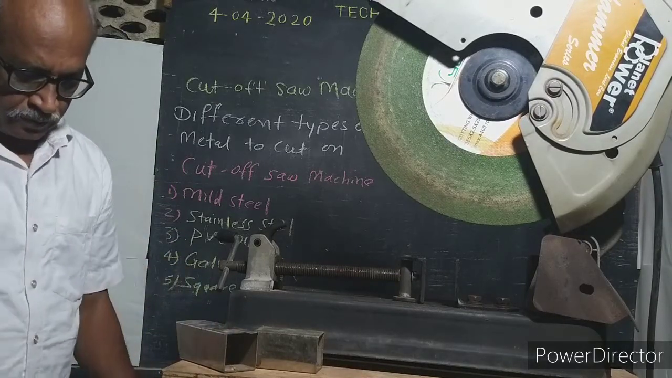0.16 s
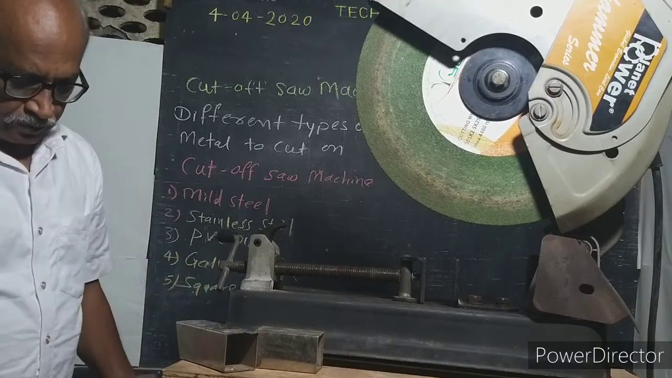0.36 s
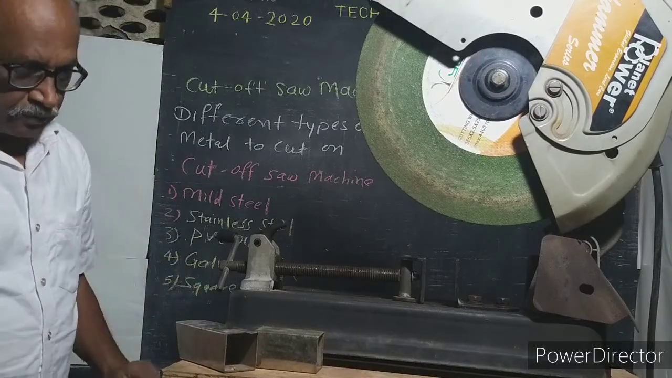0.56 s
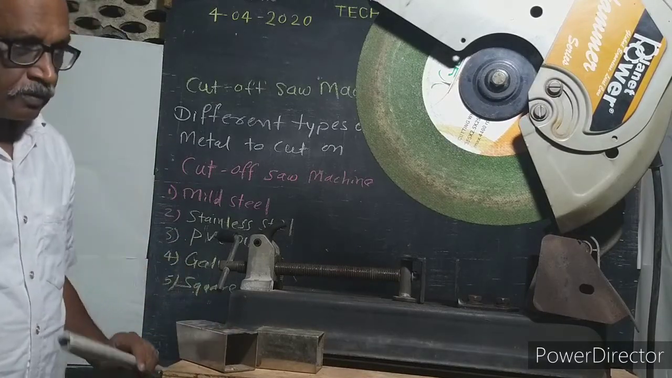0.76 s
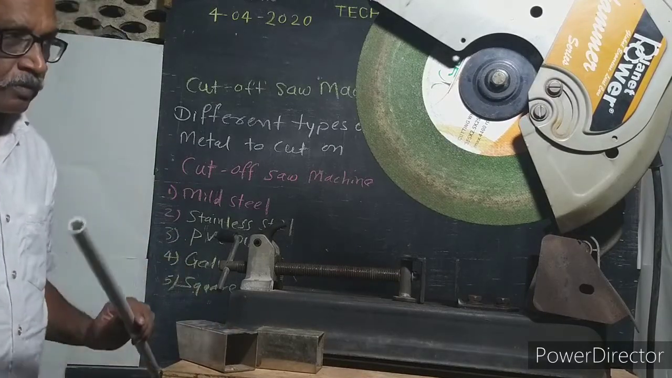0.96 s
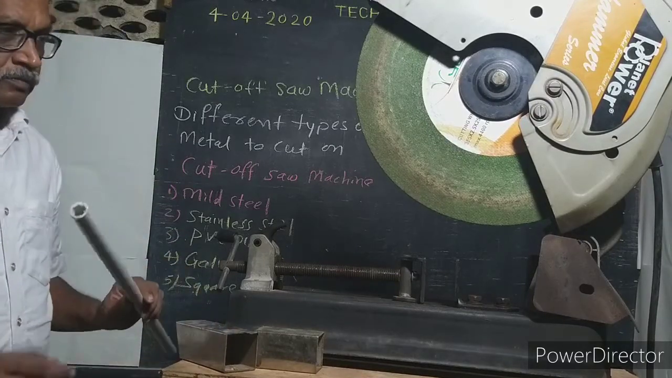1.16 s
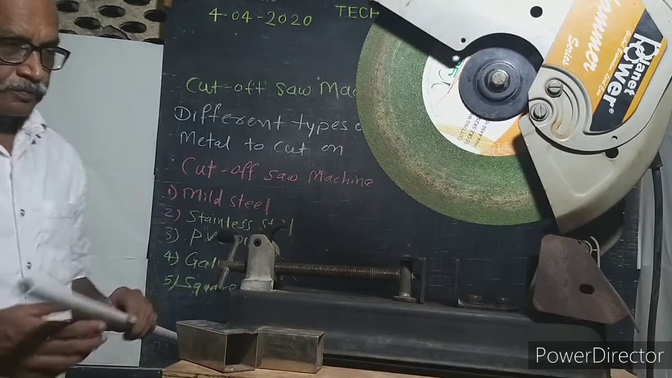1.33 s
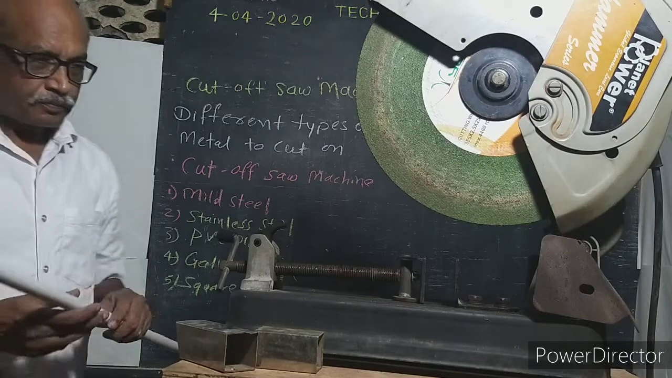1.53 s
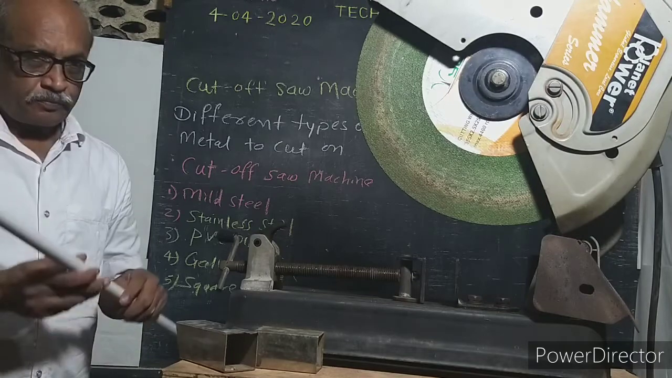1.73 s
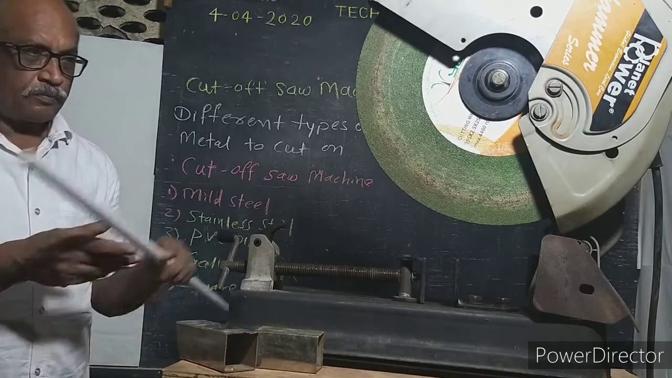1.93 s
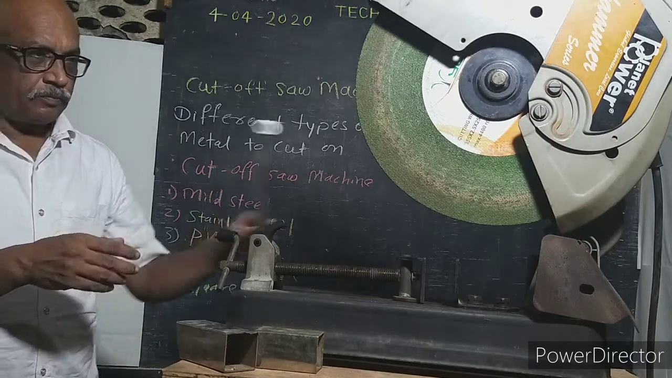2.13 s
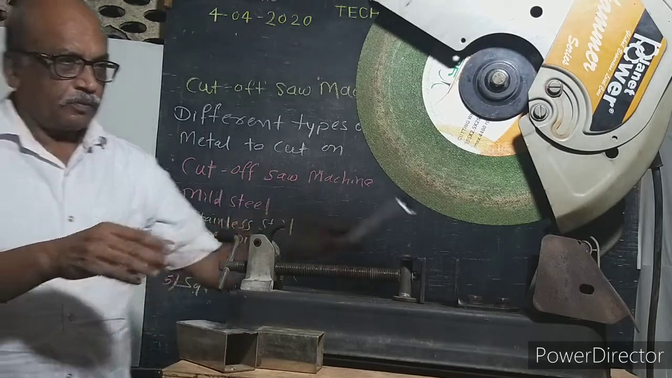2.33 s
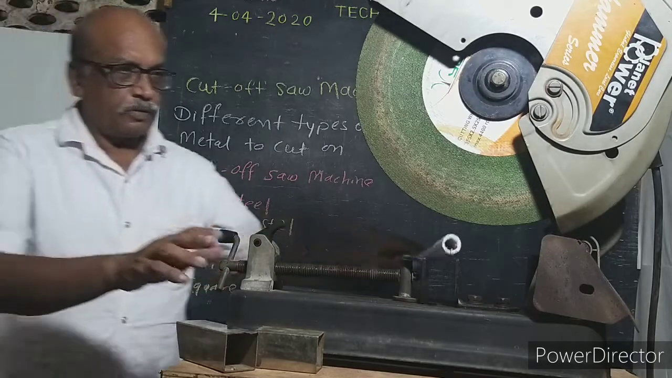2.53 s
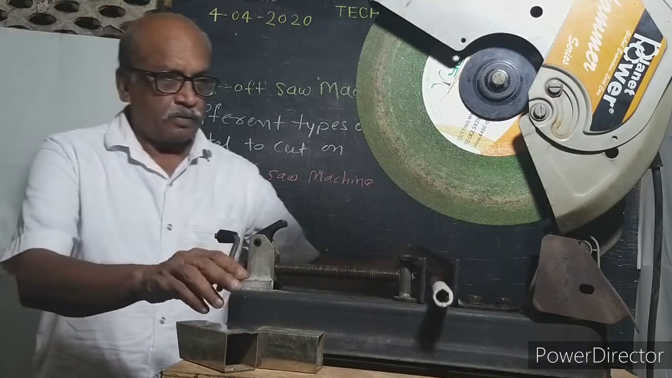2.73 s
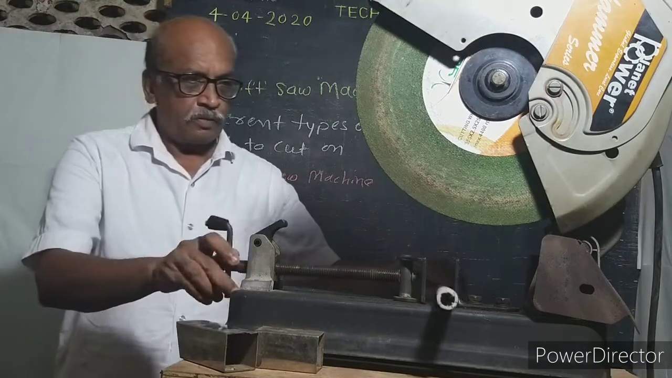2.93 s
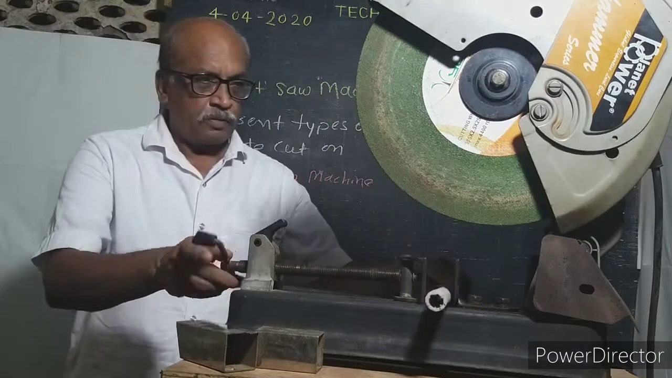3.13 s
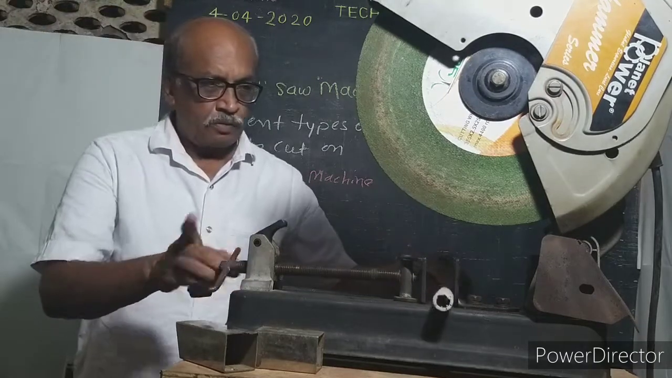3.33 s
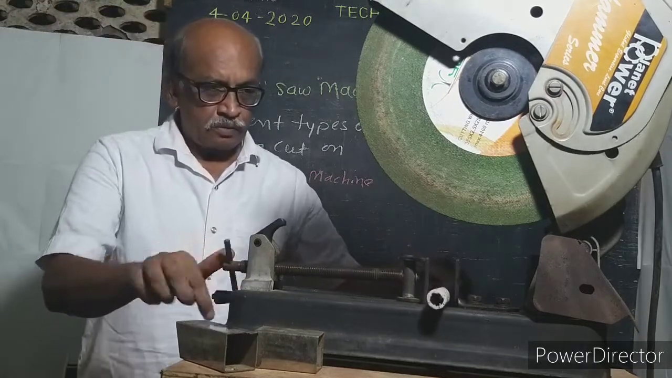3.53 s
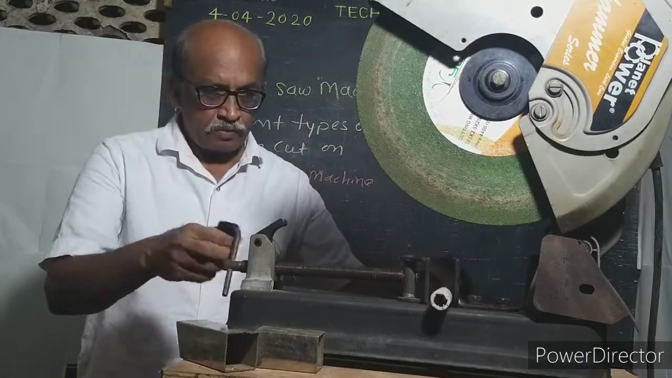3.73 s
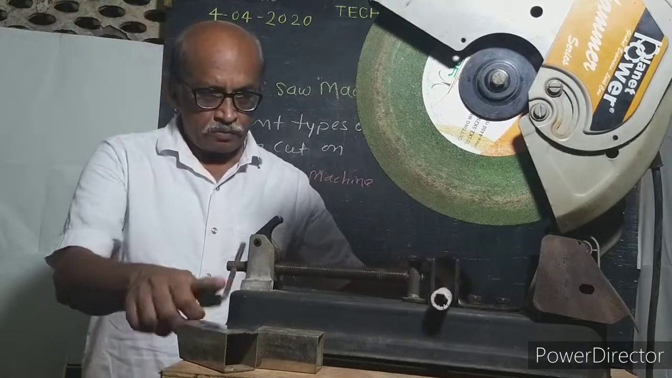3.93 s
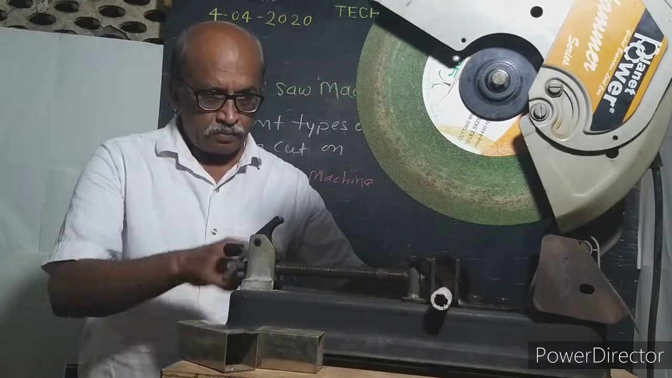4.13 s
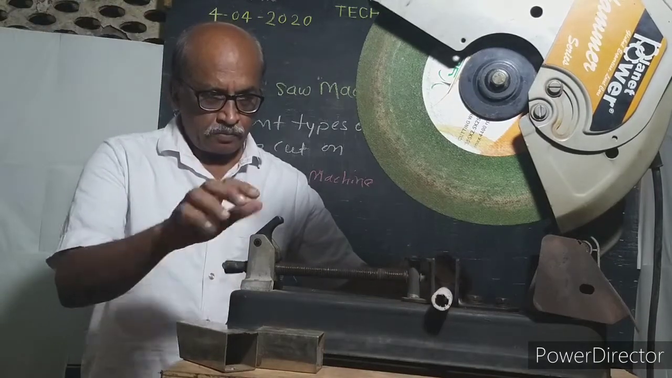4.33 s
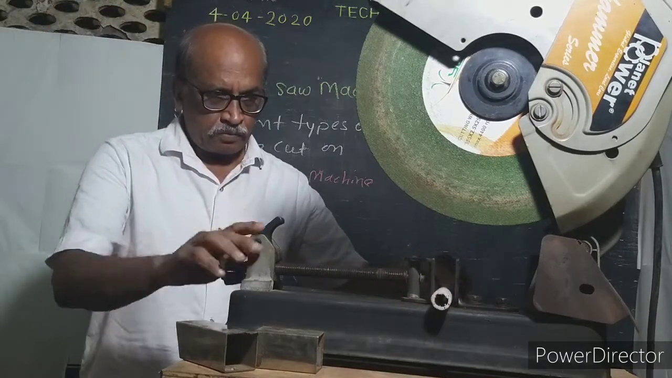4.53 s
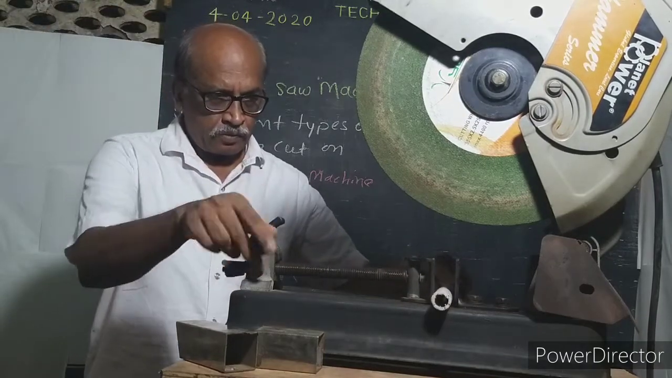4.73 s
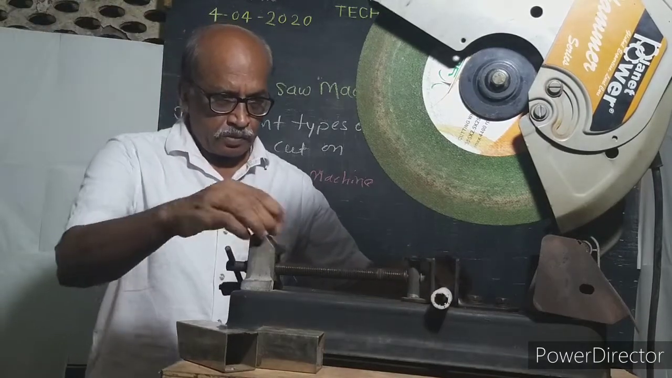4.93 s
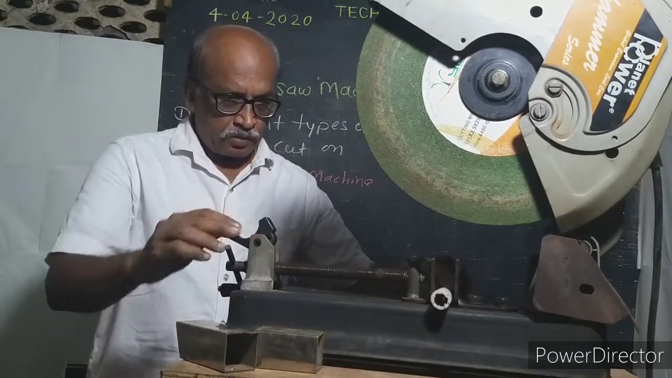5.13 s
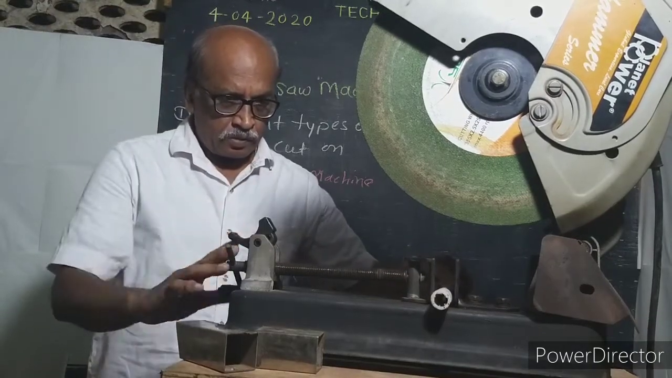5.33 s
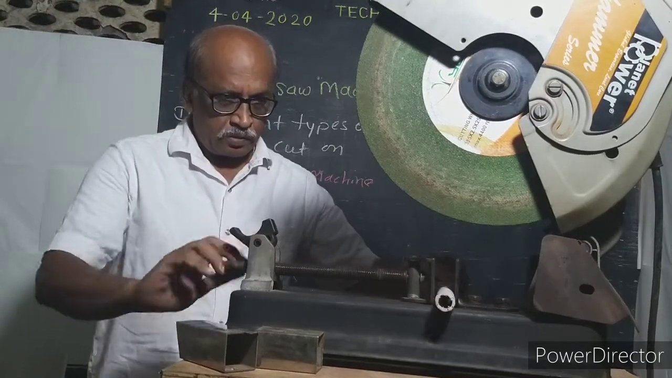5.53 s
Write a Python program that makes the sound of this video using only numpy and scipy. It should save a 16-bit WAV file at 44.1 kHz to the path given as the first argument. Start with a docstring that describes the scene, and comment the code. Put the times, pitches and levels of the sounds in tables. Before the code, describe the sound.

A small, hard workshop heard close in stereo, with low still air and barely audible mains hum. At 0 s a metal pipe clinks, fairly dull with a fine high ring that fades. Until about 2.3 s there is only quiet handling: hand and sleeve brushing metal, a dry snap near 0.54 s, soft palm pats around 0.5, 1.3 and 1.8 s, and a very faint fluttering whistle from 2.1 to 2.5 s. At 2.47 s the pipe lands on the steel bed with a solid clack, then at 2.73 s strikes the vise jaw, the loudest, brightest clang. From 2.8 s to the end the loose handle and jaw clank irregularly, clustered until 4.1 s, over soft grinding, rasping, brushing and tiny ticks. A low resonant note swells at 4.13 s among thin squeaks; another squeak comes at 4.5 s. Sparser knocks follow, a stronger clank at 5.0 s, and quiet scraping ends it.

```python
"""Clamping a pipe in a saw vise

A metal pipe is lifted, laid in the steel vise of a cut-off saw and clamped, in a small hard workshop.
It clinks, lands and knocks the jaw, and the loose handle clanks: struck modes that ring and decay.
Hand and cloth brush it (coloured noise), with soft pats, dry snaps and a faint whistle (fluttering sine).
The screw grinds and squeaks: random slips drive resonances of vise and bench, and single modes swell.
Underneath lie still air (noise) and a faint mains hum (sines)."""
import sys
import numpy as np
from scipy import signal
from scipy.fft import rfft, irfft, next_fast_len
from scipy.io import wavfile
from scipy.ndimage import uniform_filter1d

SR = 44100
rng = np.random.default_rng(int(sys.argv[2]) if len(sys.argv) > 2 else 0)


def wav_out(sig):
    """Save sig, one row per channel (or a flat mono array), as 16-bit PCM at SR to the path in sys.argv[1]."""
    wavfile.write(sys.argv[1], SR, np.round(np.clip(np.atleast_2d(sig).T, -1, 1) * 32767).astype(np.int16))


N = 250047

# Still air, relative spectrum: frequency_hz, level_db
AIR_SPECTRUM = [(15, -49), (25, -8.5), (111, -1), (249, -16), (394, -10.5), (1400, -24), (1740, -18.5),
                (3250, -26), (4030, -16.5), (5880, -20), (7310, -29.5), (14400, -31.5), (16000, -43.5)]
AIR_DB = -65.5  # rms
# Mains hum: frequency_hz, level_db (rms)
HUM = [(100, -74), (199, -79.5), (298, -83.5)]
# Correlation of left and right: frequency_hz, correlation (0-1)
STEREO_CORRELATION = [(100, 1), (300, 0.97), (700, 0.74), (1400, 0.3), (2800, 0.22), (5000, 0), (15000, 0)]

# Pipe lifted, landing on the bed, knocked against the jaw:
# start_s, boom_db, body_db, clang_db, crack_db, rattle_s, tail_db (over the rattle),
# ring_db (clear modes over the crowd of weak ones), left_over_right_db
KNOCKS = [(0.0, -27.5, -26.5, -34, -37.5, 0.0067, 0, 4, -1.8),
          (2.4711, -29.5, -23, -24.5, -38, 0.01, 0.5, 2, -1.5),
          (2.7304, -30.5, -14.5, -12, -27, 0.021, -2.5, 6, -2)]
# Modes of the free pipe: frequency_hz, relative_level_db, t60_s
PIPE_MODES = [(108.5, 3.5, 0.51), (161.7, 5, 0.43), (197.4, 5, 0.36), (323, 4, 0.26), (402.3, 4.5, 0.16),
              (554.6, -8.5, 0.44), (830, 3, 0.14), (927, -2, 0.22), (986, -17.5, 0.66), (1112, 12.5, 0.061),
              (1990, -18.5, 0.89), (2170, -0.5, 0.31), (2234, -1.5, 0.33), (4030, -2, 0.39),
              (4640, -29, 0.83), (5092, -22, 0.36), (6110, 2, 0.54), (5950, -9, 0.26), (6805, -10, 0.48),
              (9350, -9.5, 0.31), (10707, -17.5, 0.38), (11423, -19, 0.45)]
# Modes of the pipe on the machine bed: frequency_hz, relative_level_db, t60_s
BED_MODES = [(102, -1.5, 0.35), (156.7, 8.5, 0.39), (194.2, -3, 0.44), (324, -8, 0.35), (406, -4.5, 0.51),
             (549, -6, 0.42), (620, 2, 0.39), (668, 0.5, 0.41), (859, 5.5, 0.24), (1425, 0, 0.08),
             (1420, 0.5, .15), (1572, -3, .2), (1750, -4.5, 0.23), (1824, -11, 0.42), (1990, -5, 0.2),
             (2196, -7, 0.18), (2541, -13, .22), (3100, -16.5, 0.28), (3900, -18, 0.35),
             (4124, -19.5, 0.15), (4260, -18.5, 0.2), (5080, -18, 0.15), (5740, -18, 0.18)]
# Modes of the vise: frequency_hz, relative_level_db, t60_s
VISE_MODES = [(106.4, -17.5, 0.82), (156.8, -9, 0.81), (193, -5, 0.84), (273, -17.5, 0.5),
              (400.5, -23.5, .4), (464, -14, 0.72), (602.7, 2, 0.2), (634.7, 0.5, 0.42), (755, -7, .3),
              (854, -12, 0.54), (906, -4, 0.23), (958, -0.5, 0.26), (1226, -11.5, 0.14),
              (1308, -14.5, 0.17), (1358, -6, 0.402), (1623, 1.5, 0.13), (1866, -6, 0.19), (2110, -9, .22),
              (2384, 2.5, 0.18), (2668, -9, 0.08), (2777, -11.5, 0.092), (2990, -21, 0.28),
              (3170, -17, 0.14), (3520, -21, 0.27), (3680, -14.5, 0.14), (4050, -21, 0.27),
              (4350, -12.5, .22), (4670, -18.5, 0.16), (4860, -18, 0.29), (5730, -28, 0.25),
              (5650, -20, .12), (6030, -30, 0.21), (6900, -27, .25)]
# Crowd of weak modes between them, relative spectrum: frequency_hz, level_db (per Hz)
CROWD_SPECTRUM = [(40, -33.5), (75, -22.5), (105, 2.5), (200, -4.5), (260, -3.5), (400, -0.5), (700, 3),
                  (1500, -9), (2600, -11.5), (4200, -11), (6300, -13.5), (8000, -23), (11000, -25),
                  (16000, -34.5)]
# Decay of that crowd: frequency_hz, t60_s
CROWD_T60 = [(100, 0.55), (500, 0.42), (2000, 0.38), (7000, 0.35)]
# Edges of the boom, body, clang and crack registers: frequency_hz
REGISTERS_HZ = [70, 300, 1100, 3200, 17000]

# Slides of hand and sleeve over the metal: start_s, length_s, swish_db, hiss_over_swish_db
SLIDES = [(0.316, 0.059, -63.5, -9), (0.448, 0.1, -49.5, -4), (0.796, 0.23, -74, -31),
          (1.414, 0.13, -83, 12), (1.542, 0.095, -63.5, -4.5), (1.799, 0.041, -49, -4),
          (1.975, 0.096, -57.5, -6), (2.327, 0.16, -61.5, -5.5), (2.547, 0.19, -56.5, -0.5),
          (2.735, 0.19, -46.5, -7), (3.005, 0.2, -61, -5), (3.243, 0.12, -57.5, -3.5),
          (3.425, 0.074, -54, -4.5), (3.637, 0.19, -54, -12), (3.887, 0.25, -56, -5.5),
          (4.183, 0.24, -67, -11), (4.523, 0.12, -52, -7.5), (4.657, 0.089, -59.5, -6),
          (4.947, 0.14, -55, -4.5), (5.416, 0.27, -63, -6), (5.542, 0.17, -51, -3.5)]
SLIDE_ATTACK_S, SLIDE_T60_S = 0.068, 0.43
# Relative spectrum of the swish: frequency_hz, level_db
SWISH_SPECTRUM = [(1200, -12), (2000, -8), (3000, -4.5), (4200, -2), (6400, -3), (7500, -15.5),
                  (10000, -32)]
# Relative spectrum of the top hiss: frequency_hz, level_db
HISS_SPECTRUM = [(5000, -28.5), (7000, 2), (8500, 0.5), (12000, 0.5), (15000, -2), (17000, -5)]
# Resonances of thin steel edges when rubbed: frequency_hz, width_hz, relative_level_db
JINGLE_MODES = [(3668, 50, 3), (4120, 42, 1), (4340, 110, 0.5), (4980, 50, -2.5), (5380, 45, -1),
                (5760, 33, -4.5), (6640, 54, -7.5), (6900, 76, -2)]
# Pats of the palm on the pipe: start_s, level_db (reached again at length_s), centre_hz, length_s
PATS = [(0.539, -61.5, 218, 0.025), (0.582, -65.5, 395, .06), (1.242, -65.5, 550, .025),
        (1.296, -63.5, 344, 0.03), (1.344, -61, 132, 0.047), (1.711, -66, 1200, 0.031),
        (1.787, -61.5, 656, 0.037), (1.89, -53.5, 387, .045)]
# Grit snapping: start_s, level_db (at onset), brightest_hz, splash_over_snap_db
TICKS = [(0.5448, -30, 3760, -18), (2.484, -43, 6950, -10), (2.994, -42.5, 12000, -21),
         (3.056, -48, 9000, -17), (3.075, -35.5, 11900, -22), (3.634, -38.5, 5100, 0.5),
         (3.696, -52, 4400, -12), (3.784, -52, 9100, -3.5), (3.889, -45.5, 9100, -11.5),
         (4.078, -54, 6900, -3.5)]
# Wavering whistle while the pipe is swung over: time_s, pitch_hz, level_db (peak, before flutter)
WHISTLE = [(2.04, 1430, -87), (2.13, 1400, -69), (2.22, 1270, -79), (2.33, 1200, -73), (2.39, 1330, -76),
           (2.42, 1440, -64), (2.47, 1430, -70), (2.5, 1430, -130)]

# Pushes of the hand on the screw: start_s, length_s, grinding_db, boom_over_grinding_db,
# rasp_over_grinding_db
PUSHES = [(2.793, 0.16, -43.5, 3, -9), (3.03, 0.2, -45.5, -1, -10.5), (3.293, 0.1, -46.5, -10, -3.5),
          (3.432, .06, -40.5, 2, -5.5), (3.57, 0.11, -46, -3, -16), (3.65, 0.015, -41, 2.5, 0),
          (3.786, 0.24, -40.5, -1, -11.5), (4.047, 0.055, -38.5, -7, -9), (4.405, 0.034, -47, -2.5, -18.5),
          (4.51, .08, -43.5, -1, -6.5), (4.697, 0.13, -48.5, 2.5, -14), (4.95, 0.072, -38.5, -2, -6),
          (5.298, 0.065, -63, 6, -28.5), (5.44, 0.15, -48, 0.5, -15.5), (5.54, 0.16, -43.5, 0.5, -11)]
PUSH_ATTACK_S, PUSH_T60_S, RASP_T60_S = 0.045, 0.56, 0.54
# Low resonances that the screw drives: frequency_hz, width_hz, relative_level_db
BOOM_MODES = [(107.7, 13, 3), (127.6, 7.4, -0.5), (152, 5.4, -0.5), (187.2, 9.6, 2), (264, 56, -13)]
# Middle resonances that the screw drives: frequency_hz, width_hz, relative_level_db
GRIND_MODES = [(314, 48, -10), (365, 45, -2.5), (398, 31, -1), (432.5, 37, -5), (507.4, 18, 0),
               (548, 23, -3), (633, 37, 3), (743, 46, -18.5), (837, 16.4, -2.5), (976, 32, -7),
               (1028, 93, -20)]
# High resonances that the screw drives: frequency_hz, width_hz, relative_level_db
RASP_MODES = [(1220, 33, -19), (1355, 37, 6), (1623, 39, 1.5), (1896, 91, -3.5), (2050, 146, -2),
              (2353, 120, -2), (2603, 63, -2.5), (3050, 85, -6), (3375, 64, -6)]

# Clanks of handle and jaw: start_s, leading_note_hz (before detuning), level_db,
# hardness_db (treble over body)
CLANKS = [(2.868, 2400, -32.5, 2.5), (2.905, 2420, -39, -3.5), (2.976, 910, -31.5, -3.5),
          (2.998, 1330, -41.5, 4.5), (3.080, 640, -38.5, -7), (3.23, 980, -41, -15), (3.292, 1680, -55, 10),
          (3.31, 2400, -51, 8.5), (3.371, 1610, -42.5, -1), (3.458, 1330, -47.5, 5.5),
          (3.481, 1630, -39.5, 0), (3.634, 3000, -40.5, 0.5), (3.694, 2640, -35, -0.5),
          (3.703, 1447, -31.5, -1), (3.806, 1630, -44, -0.5), (3.924, 1365, -41, -7.5),
          (3.986, 810, -38.5, -7.5), (4.1, 2380, -38, -5.5), (4.422, 1004, -44, -18),
          (4.531, 3300, -48.5, -13), (4.582, 625, -48, 1), (4.679, 936, -45, -6), (4.826, 680, -48, -21),
          (4.935, 960, -40.5, -19.5), (4.974, 2400, -46, 0), (5.001, 950, -29.5, -4.5),
          (5.444, 700, -54, -10.5), (5.505, 820, -49, -11)]
CLANK_BOOM_DB, BOOM_FOLLOWS = -24, 0.62  # bench under a 0 dB clank; share of the level it follows
CLANK_CRACK_DB, CRACK_FOLLOWS = -16, 0.47  # crack over clank; share of the hardness it follows
# Brief notes of screw and handle: start_s, pitch_hz (mean), level_db (decay traced back to the start),
# swell_s, t60_s
SQUEAKS = [(3.804, 6020, -45, .004, 0.13), (4.076, 6900, -54, .006, 0.22), (4.125, 664, -21, 0.035, 0.22),
           (4.19, 1380, -48.5, 0.027, 0.34), (4.21, 2550, -49.5, 0.013, 0.31),
           (4.16, 3100, -53.5, 0.019, 0.43), (4.522, 3335, -43, 0.0074, 0.27)]

CUTOFF_HZ = 15500


def from_db(db):
    """Decibels are twenty times the logarithm of a gain; this is the inverse."""
    return 10 ** (np.asarray(db) / 20)


def rms(x):
    """Effective value: the root of the mean square."""
    return np.sqrt(np.mean(x ** 2) + 1e-20)


def in_time(rows):
    """Linear interpolation of each column of a curve, sample by sample."""
    s, *columns = np.transpose(rows)
    return [np.interp(np.arange(N) / SR, s, column) for column in columns]


def at_hz(points, hz):
    """Interpolation on a logarithmic frequency axis."""
    table_hz, values = np.array(points).T[:2]
    return np.interp(np.log(hz + 1e-9), np.log(table_hz), values)


def band(x, low, high):
    """Causal Butterworth band-pass filtering."""
    sections = signal.butter(3, [low, min(high, .49 * SR)], "band", fs=SR, output="sos")
    return signal.sosfilt(sections, x)


def add(out, s, sound):
    """Superposition: a sound is added to the mix at its start time."""
    at = max(0, round(s * SR))
    out[:, at:at + sound.shape[1]] += sound[:, :N - at]


def pan(db):
    """Level difference between ears: gains of the left and right microphone."""
    return from_db(np.array([[db], [-db]]) / 2)


def correlate(mid, side, alike):
    """Partial coherence: two independent signals become left and right with a set correlation."""
    return np.sqrt(1 + alike) * mid + np.sqrt(1 - alike) * side * [[1], [-1]]


def noise(spectrum, size=N):
    """Spectral shaping of stereo white noise, coherent in the bass and not in the treble; rms 1."""
    padded = next_fast_len(size)
    hz = np.fft.rfftfreq(padded, 1 / SR)
    mid, side = rfft(rng.standard_normal((2, padded)))
    alike = np.clip(at_hz(STEREO_CORRELATION, hz), 0, 1)
    both = correlate(mid, side, alike)
    x = irfft(both * from_db(at_hz(spectrum, hz)), padded)[:, :size]
    return x / rms(x)


def friction(resonances, slips_per_s, drag_db):
    """Resonant excitation: sparse random slips and a steady noisy drag drive vise and bench; rms 1."""
    slips = (rng.random((2, N)) < slips_per_s / SR) * rng.standard_normal((2, N))
    force = slips / rms(slips) + from_db(drag_db) * rng.standard_normal((2, N))
    out = 0
    for k, (hz, width, db) in enumerate(resonances):
        radius = np.exp(-np.pi * width / SR)
        # alternating signs keep neighbouring resonances from cancelling alike
        gain = (-1) ** k * from_db(db) * (1 - radius * radius) / 2
        poles = [1, -2 * radius * np.cos(2 * np.pi * hz / SR), radius * radius]
        out = out + signal.lfilter([gain, 0, -gain], poles, force)
    low, high = resonances[0][0], resonances[-1][0]
    mid, side = band(out, low * 0.82, high * 1.13)
    alike = np.clip(at_hz(STEREO_CORRELATION, np.sqrt(low * high)), 0, 1)
    out = correlate(mid, side, alike)
    return out / rms(out)


def stroke(s, length_s, attack_s, t60):
    """Reverberant envelope: a movement of the hand swells, holds and dies away in the room."""
    t = np.arange(N) / SR - s
    swell = np.sin(np.pi / 2 * np.clip(t / attack_s, 0, 1))
    return swell * from_db(-60 * np.clip((t - length_s) / t60, 0, 2))


def blows(modes, levels_db, notes_hz, rattle_s, tail_db, ring_db, vary_db, note_db=0, rise_s=.001):
    """Modal impact of steel on steel: a rattle, then decaying modes; one stereo sound per row of levels."""
    count, early = len(levels_db), slice(0, SR // 40)
    t = np.arange(SR // 2, dtype=np.float32) / SR
    contact = np.exp(-np.minimum(t / max(rattle_s, 1e-3), 2.5) ** 4)
    onset = 1 - np.exp(-t / rise_s)

    def fade(t60):
        """Exponential decay that takes over from the level rattle."""
        tail = float(from_db(tail_db)) * np.exp(-np.log(1000) * t / t60)
        return (onset * (contact + tail * (1 - contact))).astype(np.float32)

    def unit(x):
        """Normalisation by the rms of the first 25 ms."""
        return x / np.sqrt(np.mean(x[..., early] ** 2, axis=(1, 2), keepdims=True) + 1e-20)

    hz, db, t60 = np.transpose(modes).astype(np.float32)
    angle, decay = np.float32(2 * np.pi) * hz[:, None] * t, fade(t60[:, None])
    sines, cosines = np.sin(angle) * decay, np.cos(angle) * decay
    # the point of contact favours the modes near one note and scatters the rest
    favoured = np.exp(-np.log(hz / np.array(notes_hz)[:, None]) ** 2 / .04 ** 2)
    scatter_db = vary_db * rng.standard_normal((count, len(hz)))
    strength = from_db(db + note_db * favoured + scatter_db)[:, None]
    # reflections bring each mode to the two microphones with a phase of its own
    alike = np.clip(at_hz(STEREO_CORRELATION, hz), 0, 1)
    spread = np.arccos(alike) / 2 * (-1) ** np.arange(len(hz))
    phase = 2 * np.pi * rng.random((count, 1, len(hz))) + spread * np.array([[1], [-1]])
    sine_parts = (strength * np.cos(phase)).astype(np.float32).reshape(2 * count, -1)
    cosine_parts = (strength * np.sin(phase)).astype(np.float32).reshape(2 * count, -1)

    grain = noise(CROWD_SPECTRUM, size=SR)
    starts = rng.integers(0, SR // 2, count)
    out = 0
    # where and how hard the blow lands sets the strength of each register
    for low, high, level_db in zip(REGISTERS_HZ, REGISTERS_HZ[1:], np.transpose(levels_db)):
        own = (hz >= low) & (hz < high)
        ring = sine_parts[:, own] @ sines[own] + cosine_parts[:, own] @ cosines[own]
        ring = ring.reshape(count, 2, -1)
        part = band(grain, low, high).astype(np.float32)
        crowd = np.array([part[:, i:i + len(t)] for i in starts])
        crowd = crowd * fade(at_hz(CROWD_T60, np.sqrt(low * high)))
        register = unit(float(from_db(ring_db)) * unit(ring) + unit(crowd))
        out = out + from_db(level_db).astype(np.float32)[:, None, None] * register
    return out


def workshop():
    """Stationary background: still air as coloured noise and mains hum as steady sines."""
    t = np.arange(N) / SR
    hum = 0
    for hz, db in HUM:
        hum = hum + from_db(db) * np.sqrt(2) * np.sin(2 * np.pi * (hz * t + rng.random()))
    return hum + from_db(AIR_DB) * noise(AIR_SPECTRUM)


def pipe():
    """Boundary conditions select the modes: the pipe free, on the bed and against the jaw."""
    out = np.zeros((2, N))
    for modes, knock in zip((PIPE_MODES, BED_MODES, VISE_MODES), KNOCKS):
        s, *levels_db, rattle_s, tail_db, ring_db, pan_db = knock
        # without a note boost the leading note of 1 Hz has no effect
        sounds = blows(modes, [levels_db], [1], rattle_s, tail_db, ring_db, vary_db=0.5, rise_s=0.00098)
        add(out, s, pan(pan_db) * sounds[0])
    return out


def rubbing(jingle_db=-6.5):
    """Sliding friction: skin and cloth swish over metal, and the clamped pipe's edges jingle along."""
    swish = hiss = 0
    for s, length_s, db, hiss_db in SLIDES:
        slide = from_db(db) * stroke(s, length_s, SLIDE_ATTACK_S, SLIDE_T60_S)
        swish = np.hypot(swish, slide)  # overlapping slides add in power
        hiss = np.hypot(hiss, from_db(hiss_db) * slide)
    in_vise = np.arange(N) / SR > KNOCKS[-1][0]
    jingle = from_db(jingle_db) * in_vise * friction(JINGLE_MODES, slips_per_s=65, drag_db=-5.5)
    return swish * (noise(SWISH_SPECTRUM) + jingle) + hiss * noise(HISS_SPECTRUM)


def pats():
    """Damped contact: the soft palm gives short, dull noise without ring."""
    out, t = np.zeros((2, N)), np.arange(SR // 3) / SR
    for s, db, hz, length_s in PATS:
        colour = [(hz / 8, -24), (hz / 2, -3), (hz, 0), (hz * 2, -9), (hz * 4, -28), (hz * 8, -55)]
        envelope = t / length_s * np.exp(2 - 2 * t / length_s)
        add(out, s, from_db(db) * envelope * noise(colour, size=len(t)))
    return out


def ticks(decay_s=0.0015, echo_s=0.062):
    """Impulse and room response: tiny dry snaps, each with a short splash of room."""
    out, t = np.zeros((2, N)), np.arange(SR // 8) / SR
    for s, db, hz, splash_db in TICKS:
        colour = [(hz / 10, -14), (hz / 2, -5), (hz, 0), (hz * 2, -11), (hz * 4, -26)]
        envelope = np.exp(-t / decay_s) + from_db(splash_db) * np.exp(-t / echo_s)
        add(out, s, from_db(db) * noise(colour, size=len(t)) * envelope)
    return out


def whistle(width_hz=40, flutter_share=.7):
    """Amplitude modulation: slow noise makes a thin, gliding tone flutter as the pipe swings."""
    hz, db = in_time(WHISTLE)
    slow = signal.butter(2, width_hz, fs=SR, output="sos")
    flutter = signal.sosfilt(slow, rng.standard_normal((2, N)))
    swung = np.arange(N) / SR > WHISTLE[0][0]
    envelope = swung * from_db(db) * (1 + flutter_share * flutter / rms(flutter))
    return envelope * np.sin(2 * np.pi * np.cumsum(hz) / SR)


def screw():
    """Stick and slip in the thread: each push grinds and rasps, and shakes the bench."""
    boom = grind = rasp = 0
    for s, length_s, db, boom_db, rasp_db in PUSHES:
        push = from_db(db) * stroke(s, length_s, PUSH_ATTACK_S, PUSH_T60_S)
        rasping = from_db(db + rasp_db) * stroke(s, length_s, PUSH_ATTACK_S, RASP_T60_S)
        # overlapping pushes add in power
        grind = np.hypot(grind, push)
        boom = np.hypot(boom, from_db(boom_db) * push)
        rasp = np.hypot(rasp, rasping)
    return (boom * friction(BOOM_MODES, slips_per_s=75, drag_db=-2)
            + grind * friction(GRIND_MODES, slips_per_s=220, drag_db=-6)
            + rasp * friction(RASP_MODES, slips_per_s=540, drag_db=-2.5))


def handle(evenness=0.33, detune=0.0182):
    """Contact stiffness sets the spectrum: harder knocks of handle and jaw clang and crack more."""
    out = np.zeros((2, N))
    times, notes_hz, body_db, hardness_db = np.transpose(CLANKS)
    boom_db = CLANK_BOOM_DB + BOOM_FOLLOWS * body_db
    clang_db = body_db + hardness_db
    crack_db = body_db + CLANK_CRACK_DB + CRACK_FOLLOWS * hardness_db
    levels_db = np.transpose([boom_db, body_db, clang_db, crack_db])
    # light blows wake the modes more evenly
    modes = [(hz, mode_db * (1 - evenness), t60) for hz, mode_db, t60 in VISE_MODES]
    sounds = blows(modes, levels_db, notes_hz, rattle_s=0.011, tail_db=-2.0, ring_db=4.0,
                   vary_db=8.0, note_db=11.5, rise_s=0.00072)
    # the changing load on the jaw shifts the modes a little from knock to knock
    steps = np.arange(sounds.shape[2])
    for s, sound, shift in zip(times, sounds, rng.uniform(-0.995, 1, len(times))):
        read_at = steps * (1 + detune * shift)
        add(out, s, np.array([np.interp(read_at, steps, side, right=0) for side in sound]))
    return out


def squeaks(wander_hz=24.2):
    """Self-excited modes swell and ring out; stick and slip make their pitch unsteady."""
    out, t = np.zeros((2, N)), np.arange(SR // 2) / SR
    for s, hz, db, swell_s, t60 in SQUEAKS:
        envelope = (1 - np.exp(-(t / swell_s) ** 2)) * from_db(db - 60 * t / t60)
        wander = uniform_filter1d(rng.standard_normal(len(t)), size=300)
        # wander_hz is the rms deviation at 1 kHz
        pitch_hz = hz + wander_hz * np.sqrt(hz / 1000) * wander / rms(wander)
        cycles = np.cumsum(pitch_hz) / SR
        add(out, s, envelope * np.sin(2 * np.pi * cycles + rng.uniform(0, 1, (2, 1))))
    return out


def scene(vise_pan_db=-1.9):
    """Superposition of all sources, each a little to the right."""
    around_vise = (workshop() + rubbing() + pats() + ticks() + whistle()
                   + screw() + handle() + squeaks())
    return pipe() + pan(vise_pan_db) * around_vise


def record(dry, ceiling=0.86):
    """Saturation and low-pass filtering: the highest peaks are rounded and the top is cut."""
    rounded = ceiling * np.tanh(dry / ceiling)
    top_cut = signal.ellip(10, .2, 80, CUTOFF_HZ, fs=SR, output="sos")
    return signal.sosfilt(top_cut, rounded)


dry = scene()
out = record(dry)
wav_out(out)
```